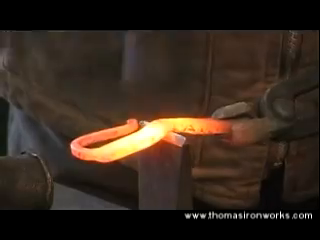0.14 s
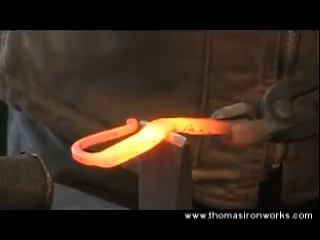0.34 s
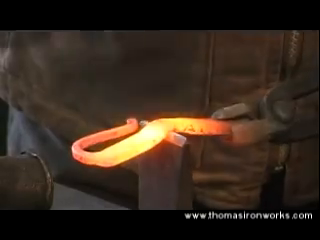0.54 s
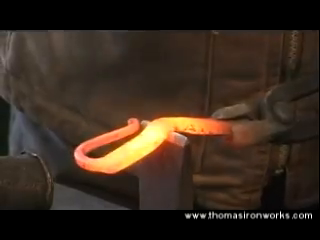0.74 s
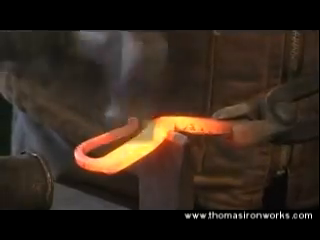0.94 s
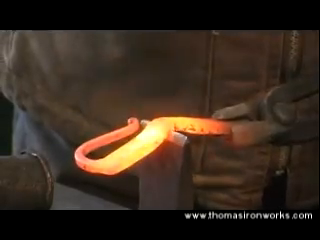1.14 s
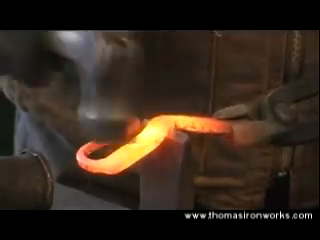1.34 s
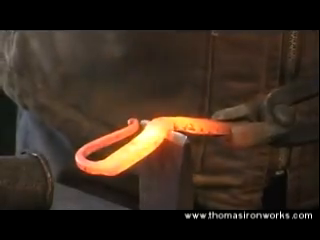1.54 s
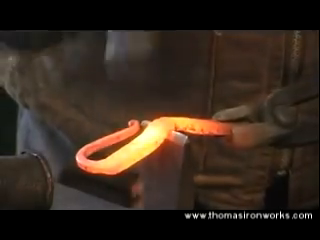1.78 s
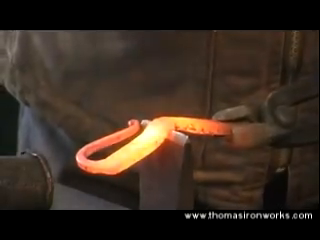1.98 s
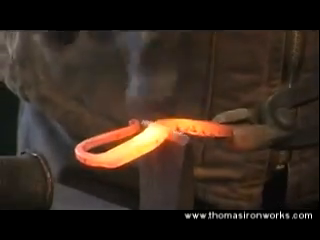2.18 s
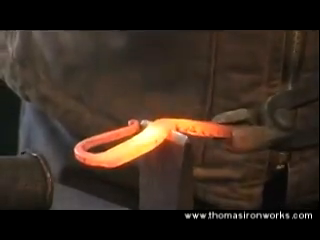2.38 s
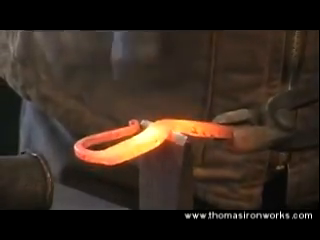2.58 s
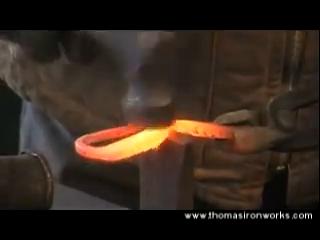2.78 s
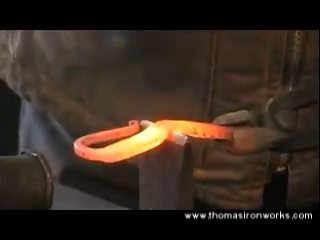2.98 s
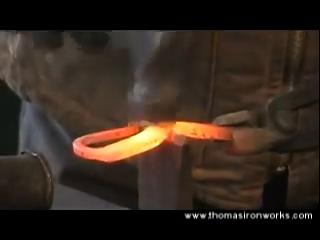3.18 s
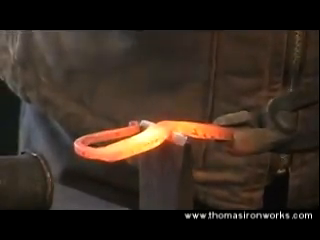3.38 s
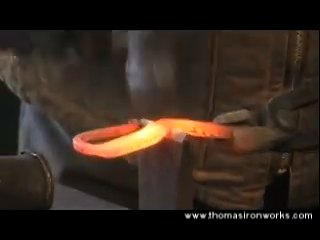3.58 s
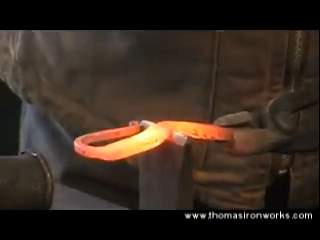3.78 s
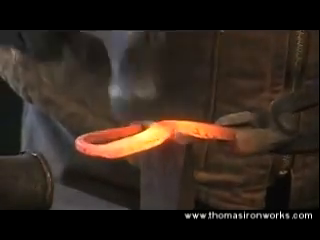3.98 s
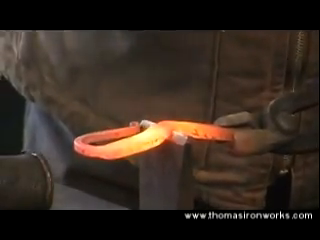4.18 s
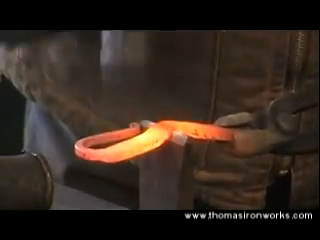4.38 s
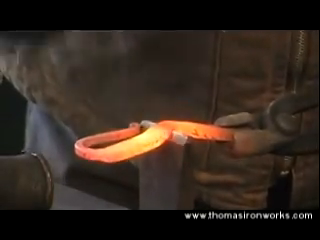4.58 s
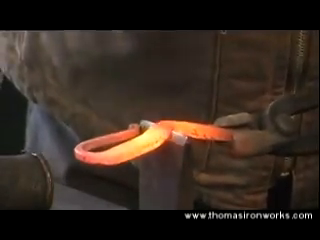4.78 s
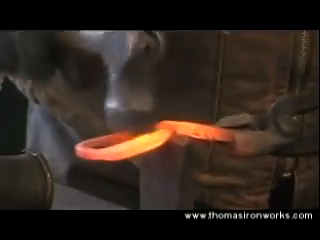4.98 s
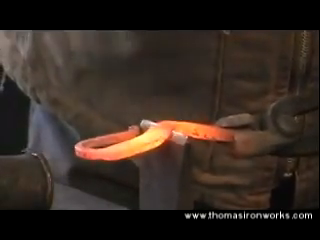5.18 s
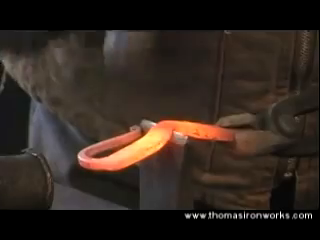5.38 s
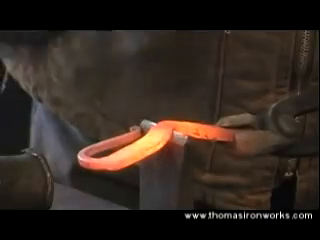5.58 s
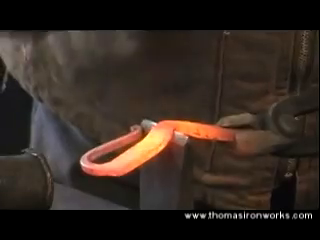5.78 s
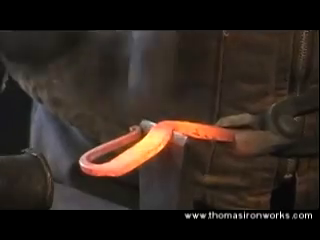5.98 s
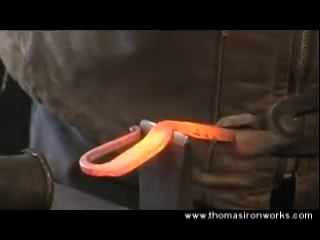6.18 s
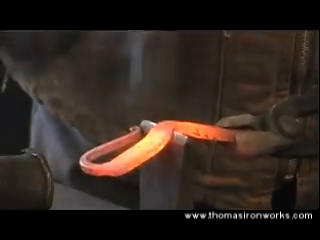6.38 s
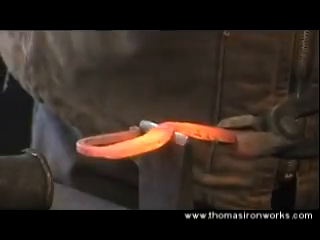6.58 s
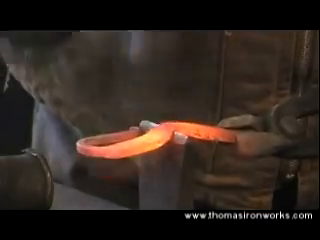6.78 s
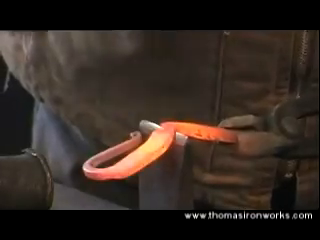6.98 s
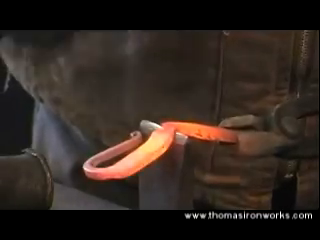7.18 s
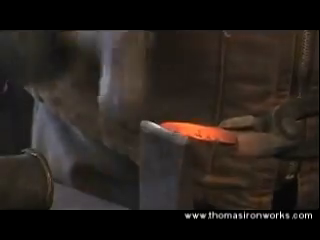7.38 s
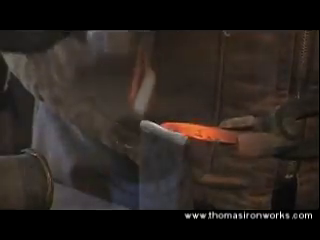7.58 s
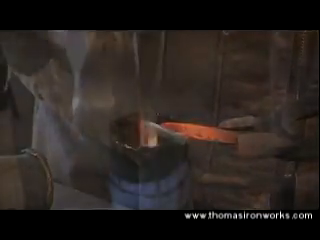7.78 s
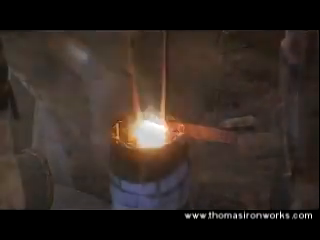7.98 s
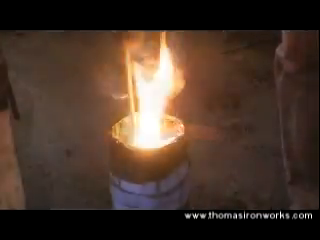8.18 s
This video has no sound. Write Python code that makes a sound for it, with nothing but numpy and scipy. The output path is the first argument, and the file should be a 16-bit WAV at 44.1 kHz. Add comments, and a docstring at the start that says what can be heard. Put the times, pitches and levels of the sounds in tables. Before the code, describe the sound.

A hammer strikes hot iron on an anvil in a steady rhythm, each dull clack ringing metallically over a low forge roar.

```python
"""In a smithy, a red-hot hook is hammered twenty times over a cutting tool in an anvil, until it parts.
Each impact on the soft iron is a dull clack that reverberates in the workshop, and excites modes of the
steel that ring on. At the end the hook is knocked into a can of oil, which flares up and spits.
Beneath it all the forge fire roars, its blower hums, and a soft low bump comes once a second."""
import sys
import numpy as np
from scipy import signal
from scipy.fft import rfft, irfft
from scipy.io import wavfile

SR = 44100
rng = np.random.default_rng(int(sys.argv[2]) if len(sys.argv) > 2 else 0)


def generate_wav(signal):
    """Clip the signal to [-1, 1] and save it as 16-bit WAV at the path in sys.argv[1]."""
    frames = np.transpose(np.atleast_2d(signal))
    scaled = np.clip(frames, -1, 1) * 32767
    pcm = np.round(scaled).astype(np.int16)
    wavfile.write(sys.argv[1], SR, pcm)


N = 363825

# Hammer blows. Contact is how solidly the hook lies on the tool; thump and low ring depend on where the
# hammer lands; choke is how hard the hook stays pressed on the tool afterwards.
# (time [s], force [dB], contact [dB], thump [dB], low ring [dB], choke [0-1])
BLOWS = [(0.2051, 1.6, 4, 0, 8.5, 0), (0.6154, 1.6, 2.5, 1, 11.5, 0), (0.9893, 0.7, 2.5, -6, 6, 0.14),
         (1.351, 0.1, -7.5, -2, 8.5, 0), (1.7036, 2, 0.5, 3, 4, .6), (2.1313, 2.6, 6, 3.5, 2.5, 0.07),
         (2.4918, 2.5, 6, -7, 5, 0.17), (2.8117, 2.05, 11, 7.5, 6, 0), (3.1353, 2.5, 11, 5, 0, 0.17),
         (3.5887, 2, 12.5, 8, 10.5, 0), (3.9776, 3, 8.5, 5.5, 2, 0.08), (4.3398, 0.8, 1, 0, 4.5, 1),
         (4.6592, 0, 0, -3, -2, 0.95), (4.9788, -0.2, -1.5, -2, -1, 0.96), (5.3271, 0, -11, -27, -4.5, 0.1),
         (5.663, -2.5, -3, -13, 5, 0.2), (6.044, 0.5, -3, -3, 8, 0.5), (6.4442, -.5, -1, -2.5, .5, 0.6),
         (6.8491, -0.8, -6.5, -13, -1, 0.1), (7.27, -2.3, -2.5, 6, -5, 0)]


def hammer_clacks(level_db=-21.0, alike=0.29, thump_hz=50.3, thump_octaves=0.71):
    """Inelastic impact: soft hot iron gives a dull broadband clack, and the yielding stand a thump."""
    # Spectrum of hammer, hook and anvil: (frequency [Hz], relative density [dB])
    clack_spectrum = [(25, -7.5), (70, 1), (130, -2.5), (250, 3.5), (350, -7.5), (450, -17), (630, -7),
                      (1000, -4), (1300, -9.5), (2500, -16), (4700, -25), (6800, -35), (8800, -49.5),
                      (12000, -54)]
    # Hollow resonances of stand and room: (frequency [Hz], width [Hz], gain [dB])
    resonances = [(160, 30, 4), (205, 50, -6), (255, 30, 2), (365, 30, 5), (622, 25, 5), (754, 30, 5),
                  (831, 30, 5), (924, 24, 9), (1033, 40, 4)]
    # Thud, knock, bite and bright edge; solid contact brightens the clack, a choked blow bites more:
    # (centre [Hz], width [octaves], base gain [dB], contact slope [dB/dB], gain at full choke [dB])
    tone_bands = [(210, 1.0, -0.02, 0.09, -0.5), (985, 0.19, -.5, -0.07, 1.5), (4430, 0.14, 2, 0, 6),
                  (8100, 0.38, 1.5, 0.38, .5)]
    hz, out = np.fft.rfftfreq(SR, 1 / SR), np.zeros(N)
    colour = amp(curve_at(clack_spectrum, hz) + peaks(hz, resonances))
    colour /= np.sqrt(np.mean(colour ** 2))
    walls = rng.standard_normal(SR)  # the reflections common to all blows
    for s, force_db, contact_db, thump_db, _, choke in BLOWS:
        paths = np.sqrt(alike) * walls + np.sqrt(1 - alike) * rng.standard_normal(SR)
        tone_db = thump_db * bell(hz, thump_hz, thump_octaves)
        for centre_hz, octaves, db, by_contact, by_choke in tone_bands:
            tone_db += (db + by_contact * contact_db + by_choke * choke) * bell(hz, centre_hz, octaves)
        # hook and tongs lie differently each time, so their brief resonances move
        tone_db += peaks(hz, rng.uniform((2600, 30, 3), (12000, 110, 9), (30, 3)))
        wash = irfft(rfft(paths) * colour * amp(tone_db), SR)
        add(out, s, amp(level_db + force_db) * in_room(wash))
    return out


def steel_rings(damped_at_s=7.92, choke_db_per_s=85, onset_gain=0.11):
    """Free vibration: each mode of the struck steel builds up in the room and decays exponentially."""
    # Modes: (frequency [Hz], base level [dB], T60 [s], build-up [s], family [0-4])
    modes = [(2304.5, -34, .43, .065, 0), (2348, -45, .38, .04, 0), (2498.5, -48, .47, .03, 0),
             (2735, -50, .37, .005, 0), (3990, -51, .29, .005, 1), (4021, -48, .29, .04, 1),
             (4199, -39, .33, .02, 1), (4626, -50, .31, .005, 1), (4926, -61, .45, .04, 2),
             (4953, -40.5, .6, .055, 2), (6578, -56.5, .55, .03, 2), (6799, -73, .63, .005, 2),
             (8215, -72.5, .8, .005, 2), (8624, -77, .44, .005, 2), (8904, -82, .52, .005, 2),
             (9297, -79, .36, .005, 2), (5502.5, -63, .68, .005, 3), (5834.5, -63, 1.6, .005, 3),
             (6079, -59, .66, .03, 3), (5760, -58, .29, .005, 4), (6330, -58, .29, .005, 4),
             (7550, -68, .25, .005, 4), (10510, -79, .22, .005, 4), (11180, -80, .22, .005, 4)]
    # Families 0 low, 1 middle, 2 high, 3 long, 4 ping; the last blow cuts through to the bare tool:
    # (base gain [dB], contact slope [dB/dB], low-ring slope [dB/dB], full choke [dB], last blow [dB])
    family_gains = [(0, 0, 0.99, 0, -2), (0, 0.68, -0.16, 5.5, -2), (-2, 1.07, -0.0075, 10, .5),
                    (1, 0.89, 0, -1, -2), (-2, .9, -0.13, 0, 18.5)]
    high, long = 2, 3
    out = np.zeros(N)
    ends = [row[0] for row in BLOWS[1:]] + [damped_at_s]  # each blow stops the ring before it
    for (s, _, contact_db, _, low_db, choke), end in zip(BLOWS, ends):
        family_db = np.array(family_gains) @ [1, contact_db, low_db, choke, end == damped_at_s]
        t = np.arange(round((end - s) * SR)) / SR
        choked = amp(-choke_db_per_s * choke * t)
        ring = 0
        for hz, db, t60, build_s, family in modes:
            strength = amp(db + family_db[family] + rng.standard_normal())
            swell = 1 - (1 - onset_gain) * np.exp(-(t / build_s) ** 2)
            waver_depth = .1 + .2 * np.exp(-t / .15)
            waver = 1 + waver_depth * (drift(t, 70) + 1j * drift(t, 70))
            beat = 1 if family == long else rebound(t, hz)
            damping = choked if family == high else 1
            mode = np.exp(2j * np.pi * (hz * t + rng.random()) - np.log(1000) * t / t60)
            ring += np.sqrt(2) * strength * swell * damping * (waver * beat * mode).real
        add(out, s, ring * signal.windows.tukey(len(t), .005))
    return out


def rebound(t, hz):
    """Doppler effect: the rising hammer shifts a fading echo, which beats with the direct ring."""
    echo = .7 * np.exp(-t / .22) * min(1, 2300 / hz) ** 1.6
    speed_m_per_s = .78 * rng.uniform(.9, 1.1)
    shift_hz = hz * 2 * speed_m_per_s / 343
    return 1 + echo * np.exp(-2j * np.pi * shift_hz * t)


def can_knocks():
    """Damped impacts: the hook knocks on the can in short, ringless bursts of band-limited noise."""
    # Knocks and ticks: (time [s], level before the envelope [dB], centre [Hz], width [octaves])
    impacts = [(7.7452, -40.5, 1050, .85), (7.885, -44.5, 1000, .22), (7.923, -72, 4500, .4),
               (7.939, -68, 3600, .5)]
    hz, out = np.fft.rfftfreq(SR, 1 / SR), np.zeros(N)
    for s, db, centre_hz, octaves in impacts:
        band = rfft(rng.standard_normal(SR)) * bell(hz, centre_hz, octaves)
        wash = unit(irfft(band, SR))
        add(out, s, amp(db) * in_room(wash, direct=3, direct_s=.006))
    return out


def oil_flare(catch_s=7.68, catch_rise_s=0.066, flame_db=-42, plunge_s=7.92, spit_rise_s=0.032):
    """Combustion and boiling: the oil ignites and burns on, spits as the hook goes under, and simmers."""
    # Spectra of the flame and of the sizzling oil: (frequency [Hz], relative density [dB])
    flame_spectrum = [(24, -26), (40, 2), (92, -4.5), (123, 2), (203, -2), (292, -2.5), (475, -22.5),
                      (580, -12), (1170, -18), (3000, -44.5), (3900, -68), (6600, -120)]
    sizzle_spectrum = [(900, -19), (2200, 8), (3500, -5), (5500, -23), (9000, -30), (12000, -44)]
    spit_db, spit_fall_db_per_s, simmer_db = -55.5, 130, -70.5
    t = np.arange(N) / SR
    flame = amp(flame_db) * np.clip((t - catch_s) / catch_rise_s, 0, 1)
    spit = amp(spit_db - spit_fall_db_per_s * np.maximum(t - plunge_s - spit_rise_s, 0))
    immersion = np.clip((t - plunge_s) / spit_rise_s, 0, 1)
    sizzle = immersion * np.hypot(spit, amp(simmer_db))
    return flame * noise(flame_spectrum) + sizzle * noise(sizzle_spectrum)


def forge(roar_db=-48.0, hiss_db=-70, waver=0.3):
    """Combustion noise and harmonic hum: the fire roars and hisses over the blower's wavering tones."""
    # Spectra of the fire: (frequency [Hz], relative density [dB])
    roar_spectrum = [(15, -24), (25, 4), (64, -10), (97, -4), (232, -3.5), (316, -8.5), (497, -26),
                     (607, -19.5), (796, -27.5), (872, -14.5), (972, -31.5), (1060, -20), (1900, -42.5),
                     (2470, -78.5), (4180, -120)]
    hiss_spectrum = [(1500, 0), (2000, -1.5), (3000, -10), (5000, -22.5), (8000, -28), (12000, -40)]
    # Partials of the blower: (frequency [Hz], level [dB])
    partials = [(60, -66.5), (120, -58.5), (180, -55), (240, -70.5), (299.5, -54.5), (359, -65),
                (599, -69.5), (902, -71)]
    t, hum = np.arange(N) / SR, 0
    for hz, db in partials:
        phase = 2 * np.pi * (hz * t + rng.random()) + waver * drift(t, 10)
        hum += amp(db) * np.sqrt(2) * (1 + waver * drift(t, 15)) * np.sin(phase)
    return hum + amp(roar_db) * noise(roar_spectrum) + amp(hiss_db) * noise(hiss_spectrum)


def low_bumps(first_s=.7505, period_s=1, count=7, peak_db=-32, width_s=0.0037):
    """Pressure pulses: one slow push and pull of air each period, heard as a soft low bump."""
    u = (np.arange(SR // 10) - SR // 20) / SR / width_s  # time from the pulse centre, in widths
    pulse = amp(peak_db) * (u ** 2 - 1) * np.exp(-u ** 2 / 2)
    out = np.zeros(N)
    for s in first_s + period_s * np.arange(count):
        add(out, s - 1 / 20, pulse)
    return out


def in_room(wash, direct=0.23, direct_s=0.001, rise_s=0.0013):
    """Reverberation: after a sharp direct sound, dense reflections die away at each band's own rate."""
    # Reverberation time of the workshop: (frequency [Hz], T60 [s])
    decay_times = [(50, 0.17), (200, 0.39), (900, 0.34), (1800, 0.37), (3500, 0.27), (7000, 0.31),
                   (11000, 0.25)]
    hz, frame_s, spectra = signal.stft(wash, SR, nperseg=256)
    decay = amp(-60 * frame_s / curve_at(decay_times, hz)[:, None])
    tail = signal.istft(spectra * decay, SR, nperseg=256)[1][:len(wash)]
    t = np.arange(len(wash)) / SR
    return tail * (1 - np.exp(-t / rise_s)) * (1 + direct * np.exp(-t / direct_s))


def noise(spectrum):
    """Spectral shaping: steady noise of rms 1 with the given spectrum."""
    gain = amp(curve_at(spectrum, np.fft.rfftfreq(N, 1 / SR)))
    return unit(irfft(rfft(rng.standard_normal(N)) * gain, N))


def drift(t, per_s):
    """Random modulation: a wander of size about 1, with per_s new values a second."""
    knots = np.arange(0, t[-1] + 1, 1 / per_s)
    return np.interp(t, knots, rng.standard_normal(len(knots)))


def peaks(hz, resonances):
    """Resonance: a dB curve of Lorentzian peaks, each (frequency [Hz], width [Hz], gain [dB])."""
    return sum(db / (1 + (2 * (hz - f) / width) ** 2) for f, width, db in resonances)


def bell(hz, centre_hz, octaves):
    """A Gaussian band of height 1 on the log-frequency axis."""
    return np.exp(-.5 * (np.log2((hz + 1) / centre_hz) / octaves) ** 2)


def curve_at(points, hz):
    """Interpolation of a table along a log-frequency axis."""
    f, value = np.transpose(points)
    return np.interp(np.log(hz + 1), np.log(f + 1), value)


def amp(db):
    """Decibels to amplitude ratio."""
    return 10 ** (np.asarray(db) / 20)


def unit(x):
    """Normalisation to rms 1."""
    return x / np.sqrt(np.mean(x ** 2) + 1e-20)


def add(mix, s, sound):
    """Superposition of a sound on the mix at time s."""
    part = mix[round(s * SR):][:len(sound)]
    part += sound[:len(part)]


def scene():
    """Superposition: all sources sum at one point close by, heard alike in both ears."""
    mono = hammer_clacks() + steel_rings() + can_knocks() + oil_flare() + forge() + low_bumps()
    return np.array([mono, mono])


def record(dry):
    """Band limiting: a linear-phase low-pass filter removes the highest treble."""
    cutoff_hz = 12450
    lowpass = signal.firwin(511, cutoff_hz, window=("kaiser", 9), fs=SR)
    return signal.oaconvolve(dry, lowpass[None], "same")


dry = scene()
out = record(dry)
generate_wav(out)
```